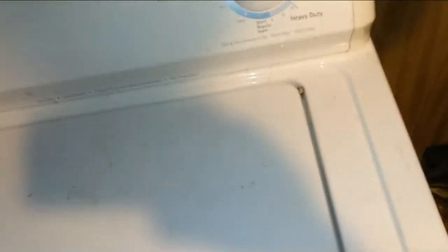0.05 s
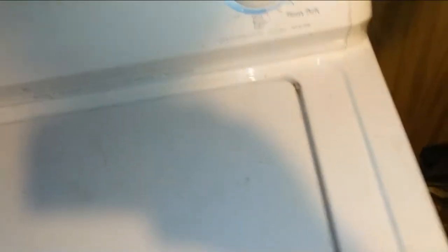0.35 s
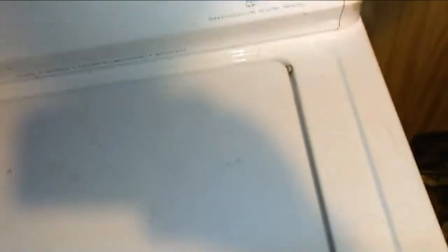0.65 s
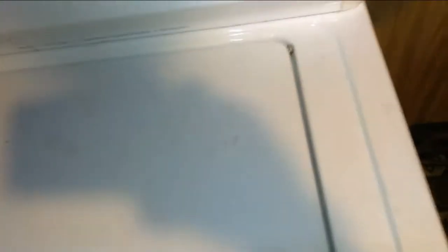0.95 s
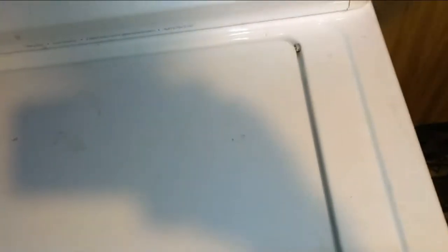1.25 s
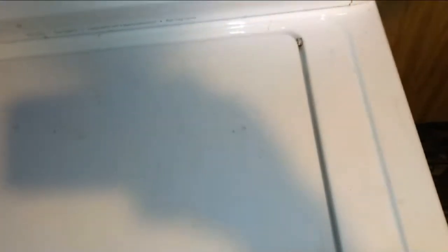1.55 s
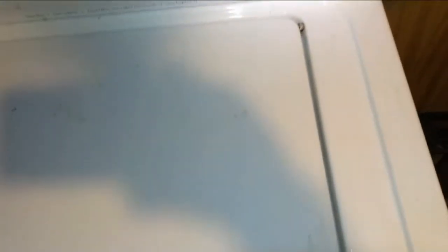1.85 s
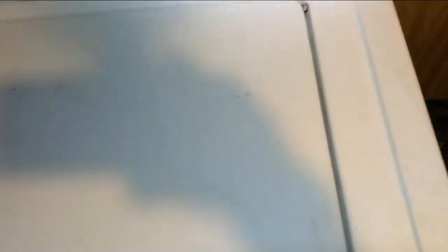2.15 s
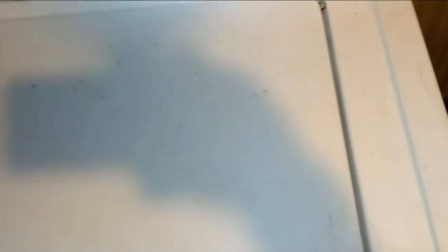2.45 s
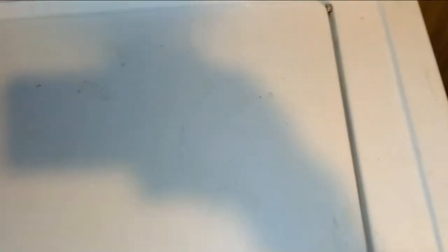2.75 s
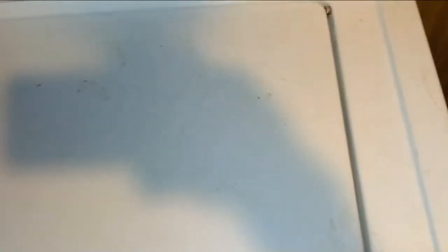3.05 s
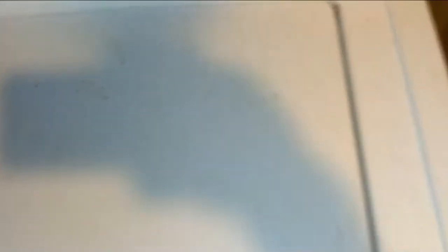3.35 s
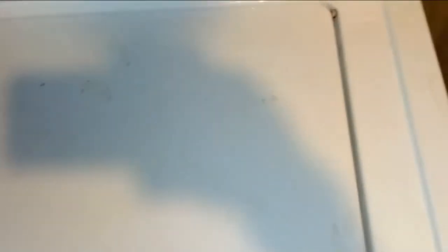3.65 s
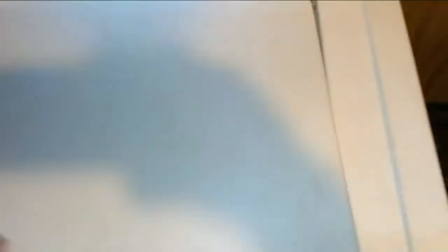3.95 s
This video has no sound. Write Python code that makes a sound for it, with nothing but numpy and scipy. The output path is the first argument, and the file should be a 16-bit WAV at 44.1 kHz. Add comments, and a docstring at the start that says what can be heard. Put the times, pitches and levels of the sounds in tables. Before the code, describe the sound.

A washing machine runs steadily indoors, close to the microphone, with a low throbbing hum and rumble. Short, evenly spaced gear groans ride over churning, bubbling water, and the load bumps the tub softly a few times around the middle.

```python
"""A small room, just above the closed lid of a top-loading washing machine agitating its load.
The induction motor hums and throbs as it slips against the mains, and the cabinet rumbles with it.
The gearbox groans briefly on every stroke of the agitator, water rushes and bubbles in the tub,
and now and then the load knocks against the side. A faint bearing buzz sits behind it all."""
import sys
import numpy as np
from scipy import signal
from scipy.fft import rfft, irfft
from scipy.io import wavfile
from scipy.ndimage import uniform_filter1d

SR = 44100
rng = np.random.default_rng(int(sys.argv[2]) if len(sys.argv) > 2 else 0)


def master(y):
    """Save y as 16-bit WAV."""
    cut = np.clip(np.atleast_2d(y).T, -1, 1)
    pcm = np.round(cut * 32767)  # scale
    wavfile.write(sys.argv[1], SR, pcm.astype(np.int16))


N = 176400

MAINS_HZ, SHAFT_HZ, STROKE_S = 60, 28.6, 0.342
THROB_CREST_S, SURGE_CREST_S, SING_CREST_S = 2.912, 0.15, 2.92  # one crest of each repeating swell
GROAN_HZ, GROAN_SAG_HZ_PER_S, GROAN_ATTACK_S, GROAN_HOLD_S = 322.3, 45, 0.012, 0.019
LOW_RELEASE_S, OCTAVE_RELEASE_S, OCTAVE_LAG_S = 0.034, 0.024, 0.00794
BUBBLES_PER_S, SPRAY_DROPS_PER_S, WASH_DROPS_PER_S = 260, 1100, 2200
OPPOSED = np.array([[1], [-1]])  # pushes left and right opposite ways

# Low motor partials that beat together: mains_multiple, shaft_multiple, level_db, stereo_width
THROB_PARTIALS = [(2, 0, -48, 0.6), (0, 5, -47.5, 0.08), (2, 1, -49.5, 0.06), (0, 6, -56.5, 0.55),
                  (2, 2, -52.5, 0.22)]
# Slow ride on the throb: time_s, gain_db
THROB_RIDE = [(0, -3), (.2, -1), (.45, -7), (.68, -3.5), (.9, -1), (1.12, -4), (1.35, -5), (1.58, -0.5),
              (1.9, 0), (2.35, -3.5), (2.6, 0), (2.9, 2), (3.1, -2), (3.4, -5), (3.65, 0), (4, -1)]
# Steady motor hum: mains_multiple, shaft_multiple, level_db, stereo_width
HUM_PARTIALS = [(0, 2, -67.5, 0.8), (0, 8, -57.5, 0), (4, 0, -52, 0.3), (4, 1, -64, 0), (6, 0, -50, 0.55),
                (8, 0, -58, 0.66), (10, 0, -58, 0.56), (12, 0, -64.5, 0.3), (14, 0, -62.5, 0.1),
                (16, 0, -64, 0.34), (0, 38, -62, 0), (20, 0, -71.5, 0.3), (0, 50, -56.5, 0.61)]
# Other tones of the drive and panels: pitch_hz, level_db, stereo_width
DRIVE_TONES = [(114.2, -58, 0.05), (142.4, -57, .1), (304, -54, 0.63), (572, -67, 0.1), (1857, -63, 0.92),
               (2063, -70, 1), (2200, -70, 0.99)]
# Envelope of the rotor's low drone: time_s, level_db
DRONE_ENVELOPE = [(0, -78), (.35, -71), (.7, -60), (1.3, -67), (1.8, -59), (2.8, -65), (3.3, -61), (4, -60)]
# Envelope of the rotor's whine: time_s, level_db
WHINE_ENVELOPE = [(0, -74), (.7, -61), (1.3, -55), (2.3, -53), (3, -52), (4, -53.5)]
# Tone colour of the cabinet rumble: frequency_hz, density_db
RUMBLE_SPECTRUM = [(20, -100), (38, -91), (58, -75), (100, -73), (135, -59.5), (165, -66), (205, -69),
                   (260, -67), (290, -65.5), (315, -61), (365, -71), (450, -68.5), (520, -82.5),
                   (900, -103), (2000, -115)]
# Slow ride on the rumble: time_s, gain_db
RUMBLE_RIDE = [(0, -3.5), (.5, -0.5), (1.2, -0.5), (2.5, 0), (3.2, -0.5), (4, -1)]
# Gearbox groans, one per stroke: start_s, low_level_db, octave_level_db
GROAN_CUES = [(0.184, -42, -40.5), (.526, -38.5, -43.5), (.876, -42.5, -40), (1.212, -37, -46),
              (1.553, -37.5, -46), (1.905, -41.5, -41), (2.25, -36.5, -41.5), (2.582, -35, -41.5),
              (2.929, -43.5, -42), (3.266, -38.5, -48), (3.61, -40, -38.5), (3.956, -45, -43.5)]
# Tone colour of the water under the lid: frequency_hz, density_db
RUSH_SPECTRUM = [(200, -103), (480, -81.5), (610, -70), (780, -80.5), (900, -76.5), (1350, -79.5),
                 (1700, -84), (2050, -84.5), (2500, -90.5), (3200, -94), (4000, -99), (5500, -100),
                 (8000, -107), (10500, -109.5), (14000, -116)]
# Slow ride on the water's hiss: time_s, gain_db
HISS_RIDE = [(0, 0.1), (1.3, 0), (2.4, 0), (3.1, -.8), (4, -0.4)]
# Waves washing up the tub: crest_s, half_length_s, level_db
WASH_CUES = [(0.874, 0.022, -64), (1.007, .04, -64), (1.262, 0.048, -60), (2.0, .05, -70), (2.4, 0.02, -64),
             (2.704, .05, -65), (2.86, 0.054, -62), (3.085, 0.09, -65), (3.67, .025, -65)]
# Knocks of the load on the tub: start_s, pitch_hz, level_db
KNOCK_CUES = [(1.507, 720, -36), (2.029, 880, -42), (2.468, 309, -33)]
# How alike left and right are in the lows and mids: frequency_hz, correlation
STEREO_LIKENESS = [(30, 0), (80, 0), (150, 0.57), (250, 0.74), (320, 0.73), (420, 0.72), (520, 0.84),
                   (650, 0.75), (1000, 0.041)]
# Higher up, the sides are alike and opposed by turns along the spectrum: frequency_hz, depth
STEREO_COMB = [(500, 0.18), (1000, 0.91), (2100, 0.95), (3200, 0.76), (4200, 1), (5300, 0.65), (7300, 0.7),
               (9500, 0.1), (13000, 0.05)]


def motor_throb():
    """The low hum swells each time a rotor pole slips past the field."""
    slip_hz = 2 * (MAINS_HZ - 2 * SHAFT_HZ)
    partials = motor_partials(THROB_PARTIALS) + [(125.2, -51, 0.3)]  # plus one low drive tone
    hum = sum(tone(hz, db, width, wander_rad=0.087, waver_db=0.7) for hz, db, width in partials)
    swell_db = 0.8 * np.cos(2 * np.pi * slip_hz * (times() - THROB_CREST_S))
    return hum * undb(ride(THROB_RIDE) + swell_db)


def motor_hum():
    """Mains hum, drive tones, the rotor's drone and whine, and a panel that sings on each stroke."""
    drone = (3 * SHAFT_HZ, ride(DRONE_ENVELOPE), 0.3)
    hum = np.zeros((2, N))
    for hz, db, width in [*motor_partials(HUM_PARTIALS), *DRIVE_TONES, drone]:
        wander_rad = 0.11 + 0.49 * hz / 1000  # higher partials wander more
        hum += tone(hz, db, width, wander_rad, waver_db=1, start_rad=rng.uniform(0, 2 * np.pi))
    whine = tone(25 * SHAFT_HZ, ride(WHINE_ENVELOPE), width=0.5, wander_rad=0.25, waver_db=0.5)
    panel_db = -58.5 + 3 * stroke_swing(SING_CREST_S)
    panel = tone(18 * MAINS_HZ, panel_db, width=0.092, wander_rad=0.11, waver_db=1.5)
    return hum + whine + panel


def cabinet_rumble():
    """The panels rumble, shaken once per turn of the shaft."""
    shake = 1 + 0.05 * np.cos(2 * np.pi * SHAFT_HZ * (times() - THROB_CREST_S))
    rumble = colour(rng.standard_normal((2, N)) * unit(shake), RUMBLE_SPECTRUM)
    gain_db = ride(RUMBLE_RIDE) - 1.26 + 0.5 * drift(8.44)
    return widen(rumble * undb(gain_db))


def gearbox_groans():
    """Each stroke loads the gears: a short, rough groan and its octave, sagging in pitch."""
    out = np.zeros((2, N))
    release_at_s = GROAN_ATTACK_S + GROAN_HOLD_S
    for start_s, low_db, octave_db in GROAN_CUES:
        voices = (1, low_db, 0, LOW_RELEASE_S, 0.71), (2, octave_db, OCTAVE_LAG_S, OCTAVE_RELEASE_S, 0.14)
        for harmonic, db, lag_s, release_s, apart_rad in voices:
            age = times() - start_s - lag_s
            attack = np.clip(age / GROAN_ATTACK_S, 0, 1)
            release = np.exp(-np.maximum(age - release_at_s, 0) / release_s)
            cycles = harmonic * (GROAN_HZ - GROAN_SAG_HZ_PER_S * (age / 2 - release_at_s)) * age
            rough_phase = 2 * np.pi * (cycles + rng.random()) + 0.31 * drift(90)
            gritty_gain = np.sqrt(2) * undb(db + 1.8 * drift(160))
            out += gritty_gain * attack * release * np.cos(rough_phase + apart_rad * OPPOSED)
    return out


def water():
    """Rush, spray and bubbles in the tub: the body surges with the agitator, under hiss and washes."""
    drops = droplets(SPRAY_DROPS_PER_S)
    accents_db = 5 * np.minimum(rng.exponential(size=(2, N)), 4)
    spray = unit(drops * undb(accents_db))
    churn = undb(-1) * rng.standard_normal((2, N)) + undb(-9.5) * spray
    rush = colour(churn, RUSH_SPECTRUM) + bubbles()
    surge = undb(0.96 * stroke_swing(SURGE_CREST_S) + 0.35 * drift(10))
    body = signal.sosfiltfilt(signal.butter(2, 1800, fs=SR, output="sos"), rush)
    hiss = (rush - body) * undb(ride(HISS_RIDE) + 0.4 * drift(9.9))
    return widen(body * surge + hiss + washes())


def bubbles(low_hz=650, high_hz=1750, life_cycles=17, glide=0.088):
    """Small rising bubbles ping left or right, each bending up in pitch as it dies."""
    out = np.zeros((2, N))
    for when, pitch, size, side in rng.random((int(BUBBLES_PER_S * N / SR), 4)):
        hz = low_hz * (high_hz / low_hz) ** pitch
        start, life_s = int(when * N), life_cycles / hz
        age = np.arange(min(int(2 * life_s * SR), N - start)) / SR
        cycles = hz * age * (1 + glide * age / life_s / 2)
        ping = np.sin(2 * np.pi * cycles) * np.exp(-np.pi * age / life_s)
        accent_db = -np.log(max(1 - size, 0.01))
        out[int(2 * side), start:start + len(age)] += ping * undb(accent_db)
    return unit(out) * undb(-55.5)


def washes(centre_hz=2860):
    """Now and then a wave washes up the tub in a bright patter of drops."""
    band = [(centre_hz / 2, -14), (centre_hz, 0), (2 * centre_hz, -12), (14000, -30)]
    splash = unit(colour(droplets(WASH_DROPS_PER_S), band))
    swells = sum(undb(db) * np.exp(-((times() - at) / half_s) ** 2) for at, half_s, db in WASH_CUES)
    return splash * swells


def load_knocks(decay_cycles=7.4):
    """The load bumps the tub: soft, pitched knocks that die quickly."""
    out = np.zeros(N)
    for start_s, hz, db in KNOCK_CUES:
        cycles = np.maximum(times() - start_s, 0) * hz
        out += undb(db) * np.sin(2 * np.pi * cycles) * np.exp(-cycles / decay_cycles)
    return out


def bearing_buzz():
    """A faint buzz of high shaft harmonics that follows the slight wander of the speed."""
    shaft_angle = 2 * np.pi * SHAFT_HZ * times() + 0.021 * drift(2.84)
    out = np.zeros(N)
    for harmonic in range(28, 55):
        level_db = -74.5 + 2 * rng.standard_normal()
        out += np.sqrt(2) * undb(level_db) * np.cos(harmonic * shaft_angle + 2 * np.pi * rng.random())
    return out


def widen(pair, comb_hz=2100):
    """Blend two unrelated channels into a widened stereo image, alike and opposed by turns
    up the spectrum, treble leaning left."""
    comb = -np.tanh(0.5 * np.cos(2 * np.pi * freqs() / comb_hz)) / np.tanh(0.5)
    likeness = np.clip(curve(STEREO_LIKENESS) + curve(STEREO_COMB) * comb, -0.97, 0.97)
    mid, side = rfft(pair) * np.sqrt([(1 + likeness) / 2, (1 - likeness) / 2])
    lean_db = curve([(3000, 0.0094), (8000, 1.3)]) * OPPOSED / 2
    return irfft(np.array([mid + side, mid - side]) * undb(lean_db), N)


def tone(hz, db, width, wander_rad, waver_db, start_rad=0):
    """A wavering partial; width (0-1) is the share of its amplitude that differs between the ears."""
    phase = 2 * np.pi * hz * (times() - THROB_CREST_S) + start_rad + wander_rad * drift(5.09)
    return np.sqrt(2) * undb(db + waver_db * drift(12)) * np.cos(phase + np.arcsin(width) * OPPOSED)


def motor_partials(table):
    """Turn mains and shaft multiples into rows of pitch_hz, level_db, stereo_width."""
    return [(mains * MAINS_HZ + shaft * SHAFT_HZ, db, width) for mains, shaft, db, width in table]


def stroke_swing(crest_s):
    """A swing between -1 and 1, once per agitator stroke."""
    return np.cos(2 * np.pi * (times() - crest_s) / STROKE_S)


def droplets(per_s):
    """Scattered ticks of random strength, separate in each ear."""
    return (rng.random((2, N)) < per_s / SR) * rng.standard_normal((2, N))


def drift(rate_hz):
    """Smooth random movement with rms 1."""
    hold = int(SR / rate_hz)
    steps = np.repeat(rng.standard_normal(N // hold + 1), hold)
    return unit(uniform_filter1d(uniform_filter1d(steps, hold), hold)[:N])


def ride(table):
    """A fader move through time_s, value points."""
    return np.interp(times(), *np.array(table).T)


def colour(white, table):
    """Shape white sound to a spectrum of frequency_hz, density_db points."""
    return irfft(rfft(white) * undb(curve(table)) * np.sqrt(SR / 2), N)


def curve(table):
    """Join frequency_hz, value points on a log-frequency axis."""
    hz, value = np.array(table, float).T
    return np.interp(np.log(freqs()), np.log(hz), value)


def freqs():
    """Frequency of each spectral bin."""
    return np.maximum(np.arange(N // 2 + 1) * SR / N, 1)


def times():
    """Time of each sample."""
    return np.arange(N) / SR


def undb(db):
    """Decibels to gain."""
    return 10 ** (np.asarray(db) / 20)


def unit(x):
    """Scale to rms 1."""
    return x / np.sqrt(np.mean(x ** 2))


def scene():
    """The whole machine: motor, cabinet, gears, load and water."""
    motor = motor_throb() + motor_hum() + bearing_buzz()
    return motor + cabinet_rumble() + gearbox_groans() + load_knocks() + water()


def record(dry):
    """A steep high cut at 14 kHz."""
    return signal.sosfilt(signal.ellip(10, 0.2, 80, 14000, fs=SR, output="sos"), dry)


dry = scene()
out = record(dry)
master(out)
```